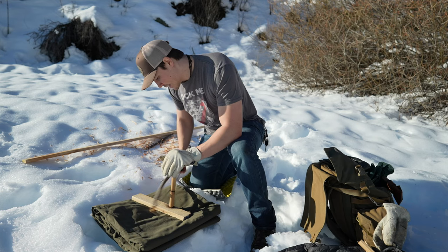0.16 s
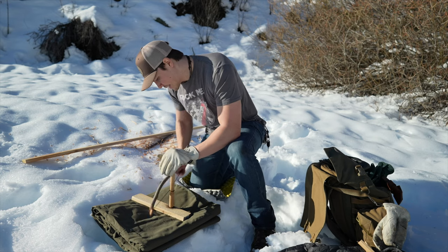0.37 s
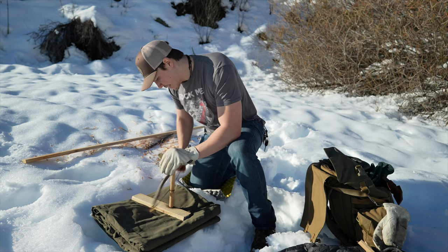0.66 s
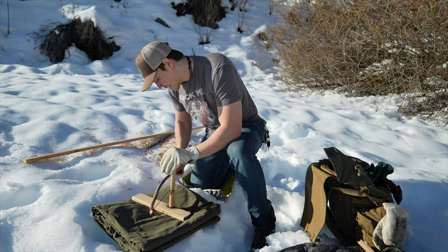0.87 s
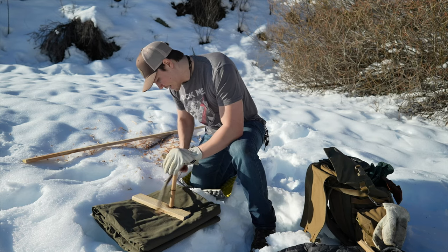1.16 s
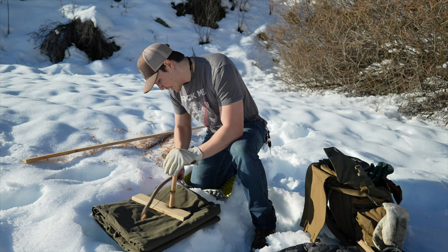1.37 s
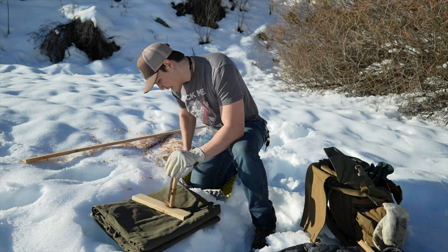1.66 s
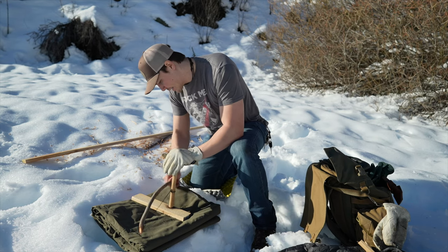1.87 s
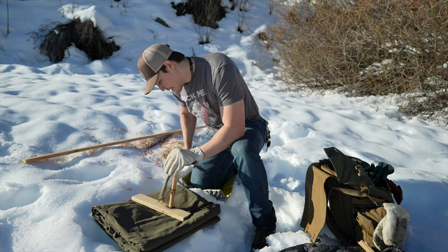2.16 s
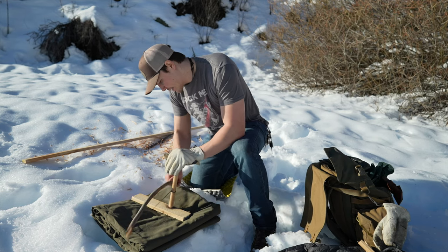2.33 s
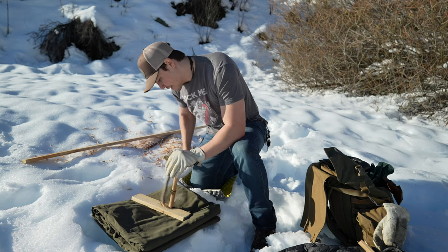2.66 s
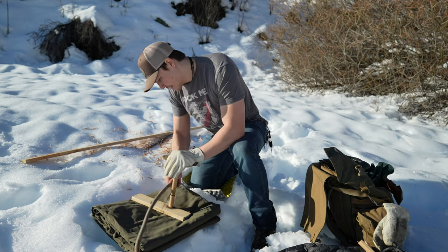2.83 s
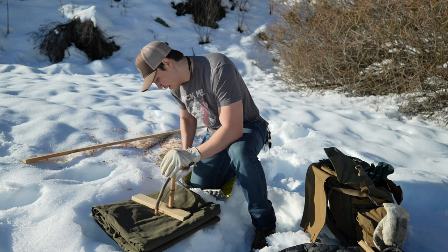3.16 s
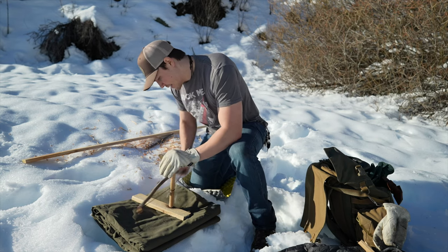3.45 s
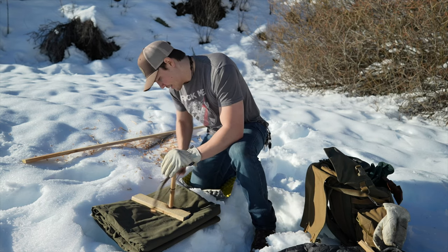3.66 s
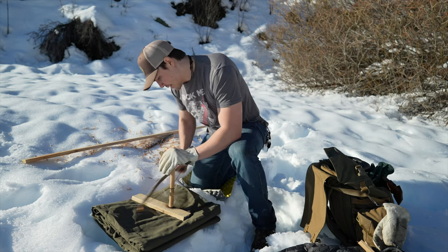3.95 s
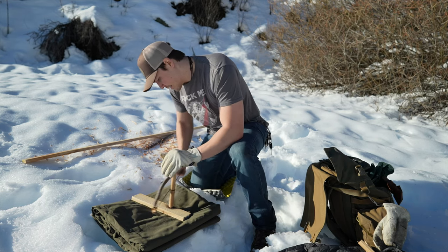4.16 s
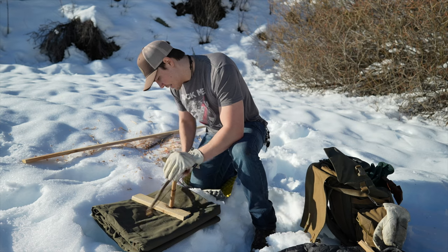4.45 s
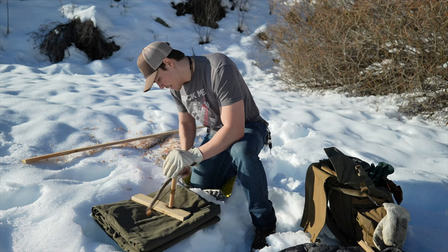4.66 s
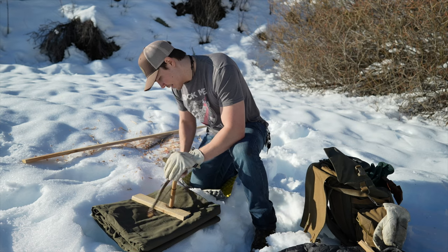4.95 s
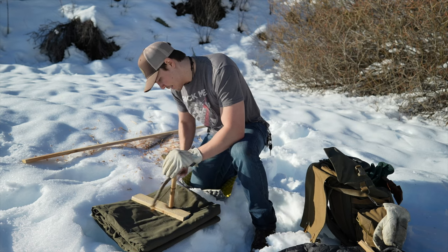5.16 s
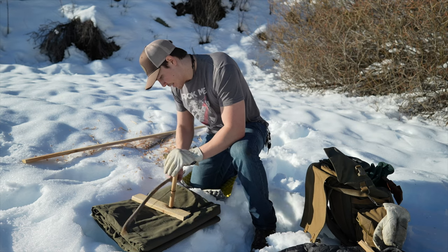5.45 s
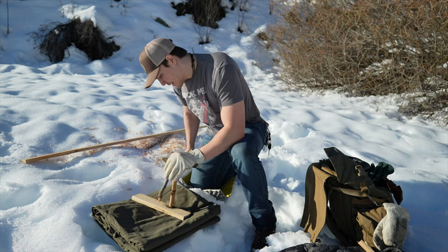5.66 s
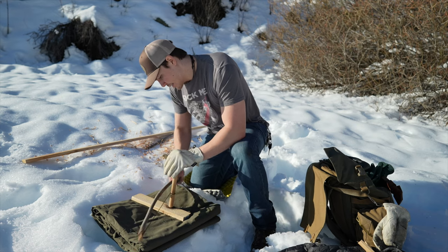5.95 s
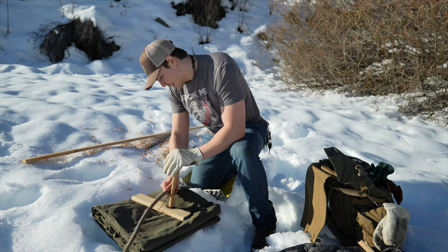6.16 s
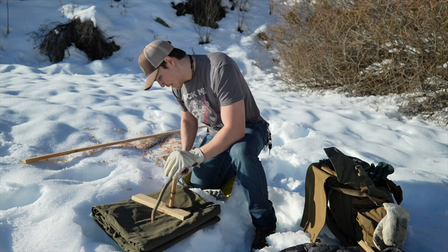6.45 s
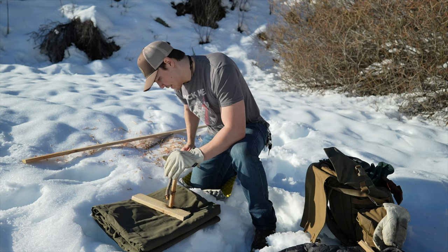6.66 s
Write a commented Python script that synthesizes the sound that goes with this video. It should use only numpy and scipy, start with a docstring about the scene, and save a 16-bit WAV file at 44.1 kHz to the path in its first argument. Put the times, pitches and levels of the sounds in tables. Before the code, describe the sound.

Quick, throbbing wood-on-wood rasps alternate about four times a second in open air, flecked with crisp ticks, then lengthen and fade to a faint scrape.

```python
"""A bow saws to and fro, spinning a wooden spindle in the socket of a hearth board on a folded mat in snow.
From the start the strokes come about four a second: fibres tear under the tip and shake snow, mat, board
and spindle, and the tip is out of round, so the rasp throbs with each turn. Cord and tip tick all along.
From 1.6 s the spindle also knocks now and then; after 5 s the strokes grow longer, and the last is faint.
Under it all lie faint creaks and the hush of open air, with almost no echo."""
import sys
import numpy as np
from scipy import signal
from scipy.fft import rfft, irfft, next_fast_len
from scipy.io import wavfile
from scipy.ndimage import map_coordinates

SR = 44100
rng = np.random.default_rng(int(sys.argv[2]) if len(sys.argv) > 2 else 0)


def ratio(d):
    """dB to gain"""
    e = np.asarray(d, float) / 20
    return 10 ** e


def unload_audio(sound):
    """Save the sound as a 16-bit wav file, at the path given as the first command line argument."""
    columns = np.transpose(np.atleast_2d(sound))
    # keep every value between -1 and 1, then stretch to whole-number steps
    steps = np.round(np.clip(columns, -1, 1) * 32767)
    wavfile.write(sys.argv[1], SR, steps.astype(np.int16))


N = 299439  # length in samples


def unit(x):
    """Scales a sound to rms 1."""
    return x / np.sqrt(np.mean(x ** 2) + 1e-20)


def filtered(x, response):
    """Passes a sound through a filter given as a complex response at each frequency."""
    size = next_fast_len(N + 8192)
    spectrum = rfft(x, size) * response(np.fft.rfftfreq(size, 1 / SR))
    return irfft(spectrum, size)[..., :N]


def ring(x, modes):
    """Sets off a group of resonances, as a solid thing rings at its own pitches; signs alternate."""
    def response(f):
        total = 0
        for k, (centre, width, db) in enumerate(modes):
            damping = 1j * f * width
            total = total + (-1) ** k * ratio(db) * damping / (centre ** 2 - f ** 2 + damping)
        return total
    return filtered(x, response)


def wobble(rate):
    """Draws a smooth random curve through `rate` random points a second."""
    points = rng.standard_normal(int(N * rate / SR) + 4)
    return map_coordinates(points, [np.arange(N) * rate / SR])


def blows(times, peaks_db, length, modes, rough):
    """Short contacts start fast, die away and ring the modes; rough 0 is a clean push, 1 is all noise."""
    age = np.arange(1024) / SR / length
    answer = ring(np.arange(N) == 0, modes)[:1024]
    noises = rng.standard_normal((len(times), 1024))
    out = np.zeros(N + SR)
    for s, db, noise in zip(times, peaks_db, noises):
        contact = (1 - rough + rough * noise) * age * np.exp(-age)
        blow = np.convolve(contact, answer)[:2048]
        out[round(s * SR):][:len(blow)] += ratio(db) * blow / np.abs(blow).max()
    return out[:N]


# bow strokes, pull and push in turn, each from one turnaround to the next:
# (turnaround [s], fastest moment [s], board level before its own offset [dB],
#  grit, shared out by the table below [dB], socket over board, likewise [dB], peakedness [exponent])
STROKES = [(-0.15, -0.047, -37, 11, 4.5, 2.9), (0.068, 0.211, -35.5, 6, 0.5, 1.05),
           (0.303, 0.444, -35.5, 6, 1.5, 1.75), (0.574, 0.697, -35.5, 9, 5, 1.33),
           (0.808, 0.944, -35.5, 8, 4, 1.8), (1.047, 1.188, -36.5, 9.5, 1, 1.65),
           (1.285, 1.426, -37, 8, 4.5, 2.2), (1.529, 1.653, -35.5, 3.5, 1.5, 0.9),
           (1.73, 1.892, -34, 5.5, 2.5, 2.04), (1.969, 2.107, -34, 11, 2, 2.4),
           (2.203, 2.345, -34.5, 4.5, 2.5, 1.53), (2.443, 2.534, -36.5, 8.5, 1, 1.46),
           (2.673, 2.81, -35.5, -3.5, 3.5, 1.66), (2.91, 3.032, -34.5, -0.8, -3.5, 1.7),
           (3.145, 3.278, -38, 4, 1.5, 1.8), (3.381, 3.507, -33.5, -0.2, -3, 1.4),
           (3.612, 3.75, -34.5, 3, 1, 1.96), (3.852, 3.966, -33.5, 5.5, -1.5, 2.1),
           (4.119, 4.252, -38, 3.5, -1, 1.52), (4.347, 4.479, -37, 0.2, -2.2, 1.4),
           (4.587, 4.752, -38, 2.5, 1.5, 1.64), (4.839, 4.991, -36.5, 0, -2, 2.46),
           (5.106, 5.247, -36.5, 3, 0.1, 2.4), (5.413, 5.554, -37, 4.5, -2.5, 1.5),
           (5.762, 5.936, -38.5, 3.5, 1, 3.2), (6.259, 6.522, -39, 0.5, -3, 0.62),
           (6.668, 6.807, -52.5, 1, 2, 4.3)]
# how snow, mat, board, socket, shaft, tip, dust and fuzz (rows, low to high) take a stroke:
# (offset [dB], change with grit [dB per dB], change with socket [dB per dB],
#  added on a push and taken off on a pull [dB], share of the peakedness [ratio])
PART_RESPONSES = [(-7, 0.18, -0.13, -0.6, 1.03), (-4, 0.05, 0.05, 0.85, 1), (1, 0, 0, -1, 1.05),
                  (1, 0, 1, 0.5, 1.09), (-7, 0.7433, 0.13, .6, 0.99), (-8.5, 0.5746, 0.23, 0.5, 0.86),
                  (-12.5, 0.86, 0.06, 0, 0.87), (-33, 1.8, 0.4, 0.5, 0.86)]


def bow():
    """Gives bow speed (0-1) and the force on each part; every stroke speeds up and slows like a sine."""
    last_turn_s, scatter_db = 6.9, 1.04  # no two strokes bear on the parts alike
    t = np.arange(N) / SR
    speed, force = np.zeros(N), np.zeros((len(PART_RESPONSES), N))
    base_db, gritty, hollow, push_db, share = np.transpose(PART_RESPONSES)[..., None]
    ends = [row[0] for row in STROKES[1:]] + [last_turn_s]
    chance = rng.standard_normal((len(STROKES), len(PART_RESPONSES), 1))
    for k, (stroke, end) in enumerate(zip(STROKES, ends)):
        start, fastest, db, grit_db, socket_db, peaked = stroke
        now = (t >= start) & (t < end)
        progress = np.interp(t[now], [start, fastest, end], [0, 1, 0])
        speed[now] = np.sin(np.pi / 2 * progress)
        parts_db = db + base_db + gritty * grit_db + hollow * socket_db
        parts_db = parts_db - (-1) ** k * push_db + scatter_db * chance[k]
        force[:, now] = ratio(parts_db) * speed[now] ** np.maximum(share * peaked, 0.1)
    return speed, force


def tearing(per_second, spread_db, smooth):
    """Fibres let go at random moments with scattered strengths, over a smooth scrape."""
    hit = rng.random(N) < per_second / SR
    kick = np.clip(rng.standard_normal(N), -2, 2)
    strength = ratio(spread_db * np.minimum(rng.exponential(size=N), 3))
    return unit(hit * kick * strength) + smooth * rng.standard_normal(N)


def rubbed(drive, modes, wander_db):
    """The contact wanders round the socket, so each mode swells and fades on its own."""
    total = 0
    for k, mode in enumerate(modes):
        total = total + ratio(wander_db * wobble(9)) * (-1) ** k * ring(drive, [mode])
    return unit(total)


# what each part rings with, low to high; levels count within one part:
# (centre [Hz], width [Hz], level [dB])
SNOW_MODES = [(118, 57, 1)]
MAT_MODES = [(204.4, 96, 9), (304, 115, -4.5)]
BOARD_MODES = [(528.5, 209, -4.5), (733, 138, -1)]
SOCKET_MODES = [(944, 192, -1.7), (1156, 174, 0.74), (1471, 253, -2)]
SHAFT_MODES = [(1886, 420, 0.92), (2300, 374, 12.7), (2970, 890, 3)]
TIP_MODES = [(4363, 436, 8.5), (4720, 1030, -2.5)]
DUST_MODES = [(5640, 620, -7), (6930, 285, 1.5), (8460, 1370, -5), (9650, 620, -8)]
FUZZ_MODES = [(11600, 640, -8), (13200, 900, 1), (15300, 410, -14)]


def rasp():
    """Torn fibres drive each part; the oval tip bites once and twice a turn, and the contact wanders."""
    speed, force = bow()
    turns = 38 * speed ** 0.6 * (1 + 0.151 * wobble(6))  # spindle turns a second
    angle = 2 * np.pi * np.cumsum(turns) / SR
    once, twice = np.cos(angle), np.cos(2 * angle + wobble(3.5))
    coarse = tearing(per_second=700, spread_db=1.5, smooth=1.0)
    middle = tearing(per_second=800, spread_db=1.0, smooth=1.0)
    fine = tearing(per_second=2500, spread_db=3.0, smooth=0.94)
    powder = tearing(per_second=3000, spread_db=2.5, smooth=0.65)
    crackle = tearing(per_second=59, spread_db=7, smooth=0.14)
    # (drive, modes, bite once a turn [dB], bite twice a turn [dB])
    parts = [(middle, SNOW_MODES, 2.2, 0.3),
             (coarse, MAT_MODES, 2.6, 0.6),
             (coarse, BOARD_MODES, 1.8, 2.8),
             (0.59 * coarse + middle, SOCKET_MODES, 1.1, 1.9),
             (0.37 * middle + fine, SHAFT_MODES, 0.8, 1.2),
             (fine + 0.078 * crackle, TIP_MODES, 0.9, 1.1),
             (powder + 0.35 * crackle, DUST_MODES, 0.7, 0.8),
             (powder + 0.37 * crackle, FUZZ_MODES, 0.8, 1.2)]
    shared_db = 0.14 * wobble(90)  # flutter common to all parts
    total = 0
    for push, (drive, modes, once_db, twice_db) in zip(force, parts):
        bite_db = once_db * once + twice_db * twice + shared_db + 0.64 * wobble(70)
        total = total + push * rubbed(ratio(bite_db) * drive, modes, wander_db=1.76)
    return total


# the clearest snaps of fibres and cord: (time [s], tip peak level [dB], cord over tip [dB])
CLEAR_TICKS = [(0.2664, -13.5, -18), (0.406, -36, 7), (0.496, -38, 4), (0.6362, -21, -10),
               (0.6976, -21, -17), (0.7771, -22.5, -2.5), (0.7835, -17.5, -9), (0.9022, -26, -2),
               (0.9601, -30, 7), (1.2414, -29, -10), (1.5886, -26.5, -1), (1.8853, -30, 3),
               (1.9551, -33.5, -2), (2.0048, -37, -12), (2.0812, -30, 2), (2.1342, -23.5, -4),
               (2.284, -39, 9), (2.3115, -28, 4), (2.3363, -29, 2), (2.3778, -31, -2), (2.3865, -36, 3),
               (2.3988, -26, -5), (2.4208, -32.5, 1.5), (2.4907, -29, -8), (2.521, -17, -11),
               (2.7598, -44, 11), (2.7889, -32, 5), (2.815, -35, 6), (2.8444, -35, 6), (3.29, -31, 2),
               (3.8778, -39, 1), (3.9315, -27, -11), (4.0466, -42, 12), (4.2567, -38, 8), (4.2948, -38, 9),
               (4.7501, -31, -2), (4.7864, -33.5, 3), (5.5009, -29, -2), (5.9144, -37, 2), (5.9913, -41, 7),
               (6.0924, -30, -0.5), (6.2873, -46, 6), (6.3259, -39, 3), (6.4387, -39, 3),
               (6.6287, -30.5, -1), (6.6456, -42, 7)]
# what the cord rings with: (centre [Hz], width [Hz], level [dB])
CORD_MODES = [(6800, 5100, 2), (9300, 1180, 10)]


def ticks():
    """Each snap is a burst of about a millisecond into tip, cord and fuzz; faint ones follow the rubbing."""
    count = 90  # faint snaps, at random moments
    when = rng.random(count)
    size, colour = rng.standard_normal((2, count))
    dust_force = bow()[1][-2, (when * N).astype(int)]
    faint_db = 3 + 20 * np.log10(dust_force + 1e-4) + 4.5 * size
    faint = np.transpose([when * N / SR, faint_db, 3.5 + 4 * colour])
    s, tip_db, cord_over_db = np.transpose(np.vstack([CLEAR_TICKS, faint]))
    cord_db = tip_db + cord_over_db
    tip = blows(s, tip_db, 0.00094, TIP_MODES, rough=0.83)
    cord = blows(s, cord_db, 0.001, CORD_MODES, rough=0.98)
    fuzz = blows(s, cord_db - 5, 0.00064, FUZZ_MODES, rough=1)
    return tip + cord + fuzz


# the spindle knocking in its socket:
# (time [s], board peak level [dB], mat over board [dB], socket over board [dB])
KNOCKS = [(1.5885, -33, 1, 6), (1.648, -31.5, 2, 4), (1.7066, -29, 4.5, 1), (2.4214, -29, -10, 2),
          (2.501, -33, -5, 4), (3.9109, -25, -7, -12), (4.948, -26, -16, -9), (4.9955, -27.5, -8, 4.5),
          (5.1985, -25, -19, -19), (5.3857, -55, -2, 17), (5.5272, -21, -8, -24), (5.589, -22, -7, -21),
          (5.736, -50, -12, 12), (6.0248, -34.5, -1, 12.5), (6.173, -57, -5, 11), (6.209, -56, -12, 17),
          (6.3578, -28, -10.5, -3), (6.4385, -29, -13, -3), (6.732, -56, -1, 16)]


def knocks():
    """A knock is a blunt push that rings the same mat and wood as the rubbing does."""
    s, db, mat_db, socket_db = np.transpose(KNOCKS)
    # (level over the board [dB], modes, contact time [s])
    parts = [(0, BOARD_MODES, 0.0002), (mat_db, MAT_MODES, 0.0006),
             (socket_db, SOCKET_MODES, 0.00012), (socket_db - 4, SHAFT_MODES, 0.00006)]
    return sum(blows(s, db + more, contact, modes, rough=0) for more, modes, contact in parts)


def creaks():
    """The loaded board keeps creaking faintly: sparse grains ring board and socket."""
    grains = tearing(per_second=58, spread_db=4.5, smooth=0.33)
    return ratio(-60.5 + 2.5 * wobble(8.7)) * unit(ring(grains, BOARD_MODES + SOCKET_MODES))


# tone of the quiet background; only the shape counts: (frequency [Hz], relative level per Hz [dB])
AIR_TONE = [(18, -30), (30, 18), (100, 3), (350, 1), (1100, 2), (2500, -6), (4500, -15.5), (7000, -16),
            (10500, -25), (15800, -33)]


def air():
    """The far hush of the open field is shaped noise, gently unsteady."""
    hz, db = np.transpose(AIR_TONE)

    def tone(f):
        return ratio(np.interp(np.log(f + 1), np.log(hz), db))
    hush = filtered(rng.standard_normal(N), tone)
    return ratio(-47 + 1.3 * wobble(6.31) + 2.85 * wobble(40)) * unit(hush)


def snow_scatter(drill):
    """Snow around the drill throws back a faint blur that dies by 60 dB in 0.053 s."""
    t = np.arange(SR // 5) / SR
    tail = rng.standard_normal(len(t)) * ratio(-60 * t / 0.053)
    return ratio(-14) * signal.fftconvolve(drill, tail / np.linalg.norm(tail))[:N]


def scene():
    """Adds up the drill, the scatter from the snow and the air, in one channel."""
    drill = rasp() + ticks() + knocks() + creaks()
    return (drill + snow_scatter(drill) + air())[None]


def band_limit(x):
    """A steep low-pass at the top of the band."""
    return signal.sosfilt(signal.butter(12, 16530, fs=SR, output="sos"), x)


def record(dry):
    """The microphone drops the deepest bass, below about 70 Hz."""
    heard = filtered(dry, lambda f: (1j * f / (70 + 1j * f)) ** 2)
    return band_limit(heard)


dry = scene()
out = record(dry)
unload_audio(out)
```